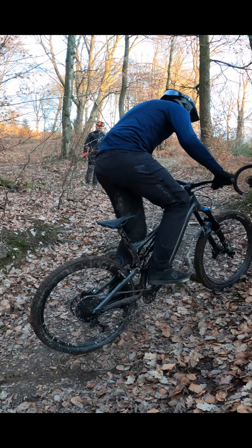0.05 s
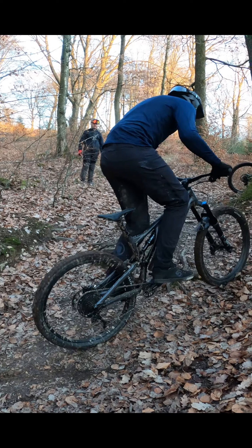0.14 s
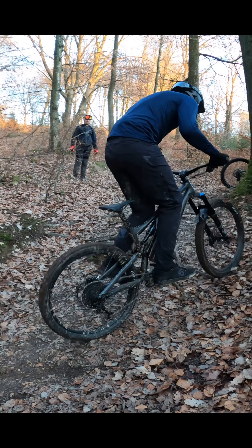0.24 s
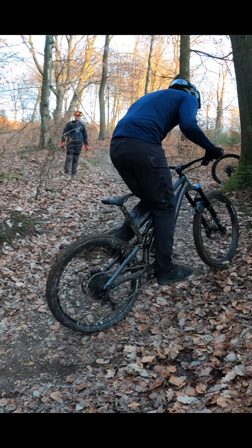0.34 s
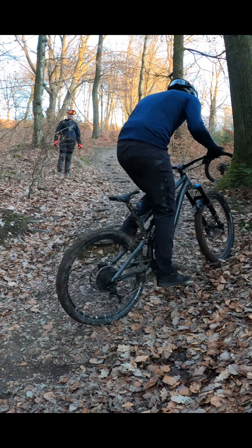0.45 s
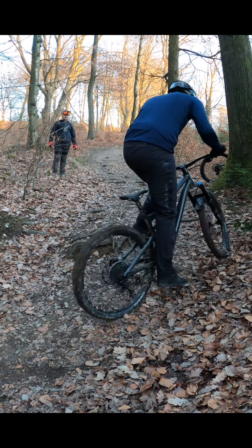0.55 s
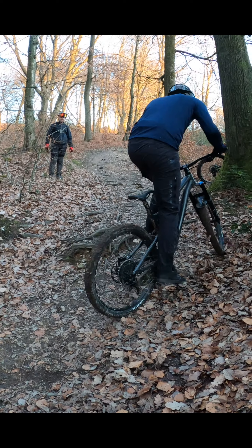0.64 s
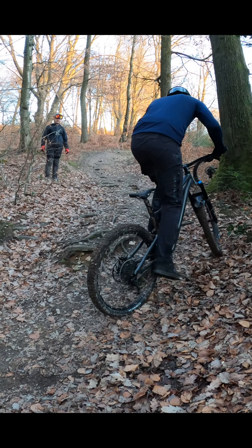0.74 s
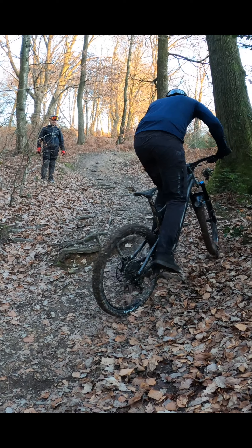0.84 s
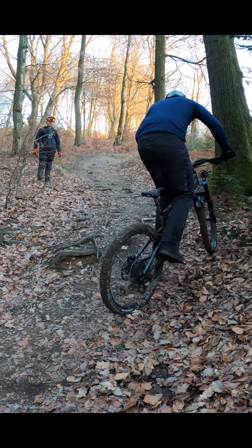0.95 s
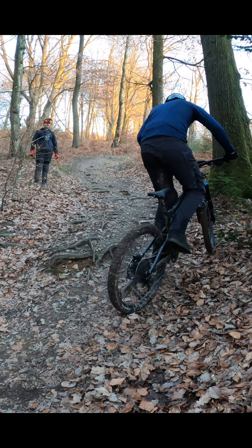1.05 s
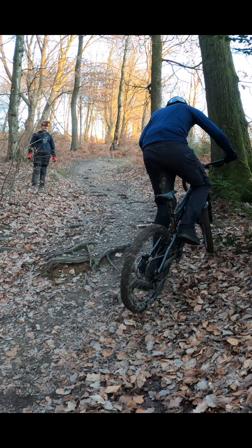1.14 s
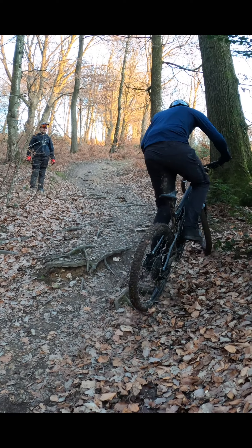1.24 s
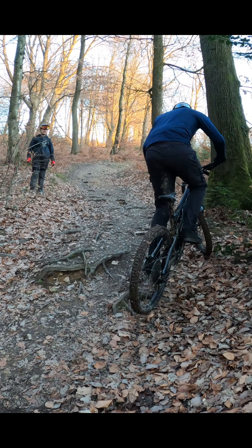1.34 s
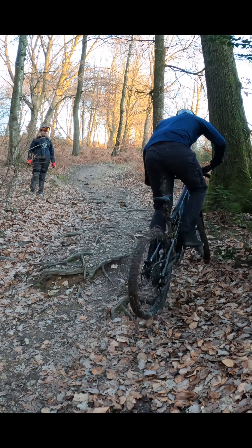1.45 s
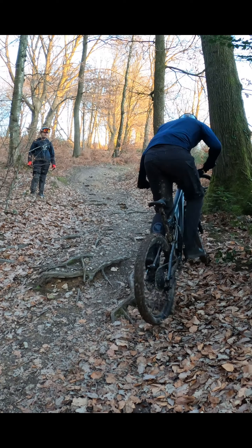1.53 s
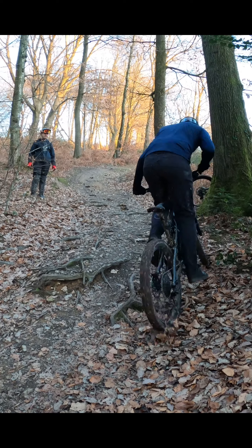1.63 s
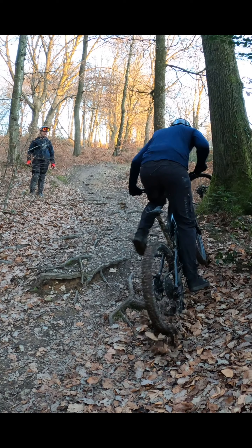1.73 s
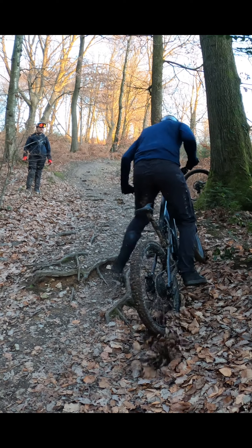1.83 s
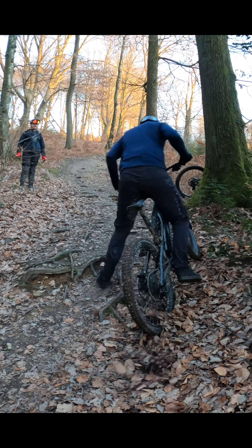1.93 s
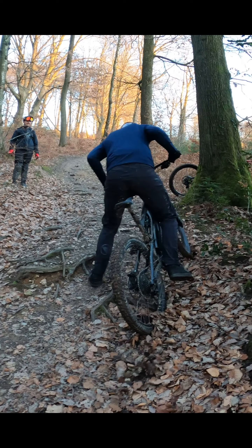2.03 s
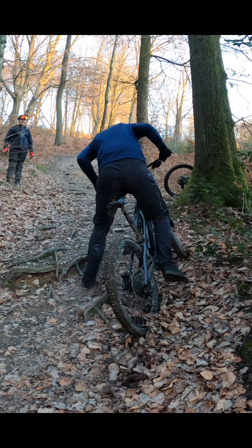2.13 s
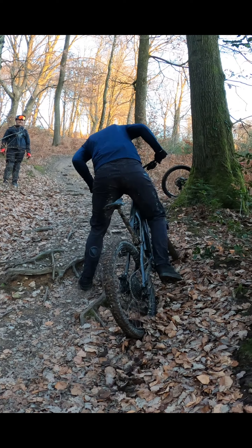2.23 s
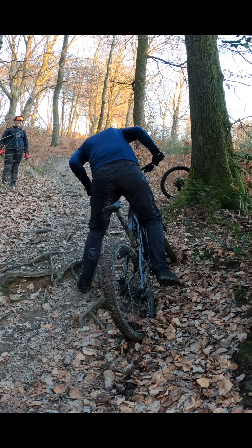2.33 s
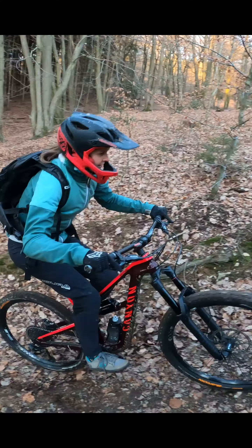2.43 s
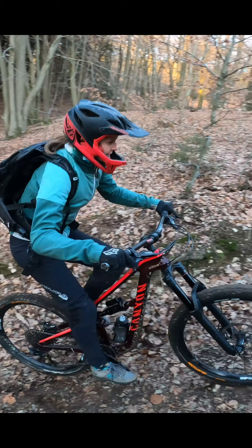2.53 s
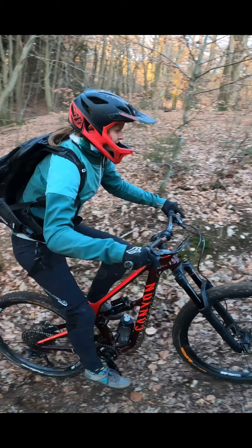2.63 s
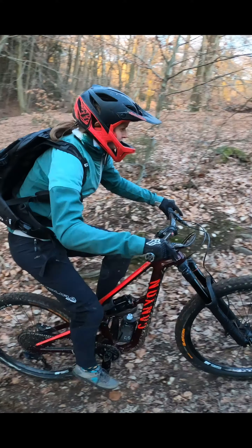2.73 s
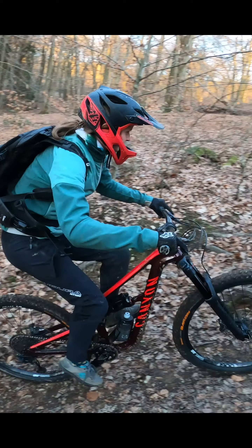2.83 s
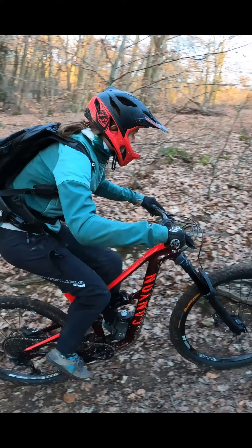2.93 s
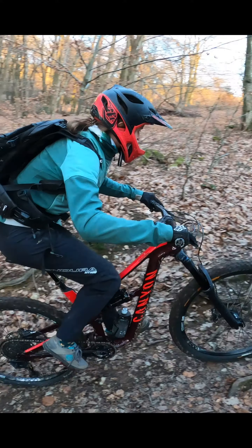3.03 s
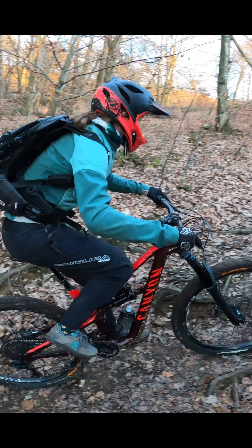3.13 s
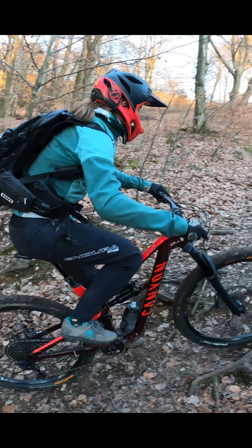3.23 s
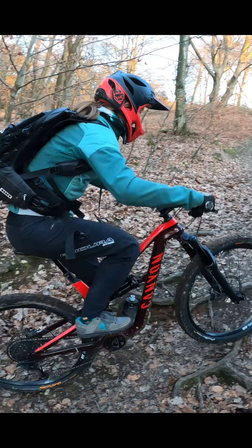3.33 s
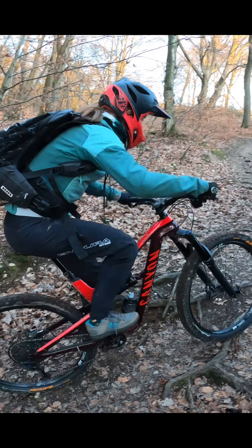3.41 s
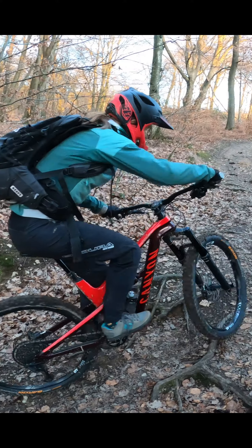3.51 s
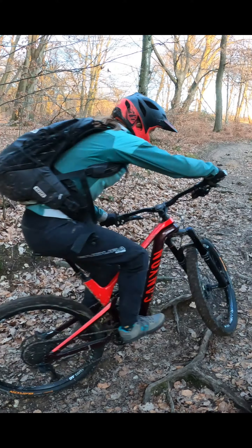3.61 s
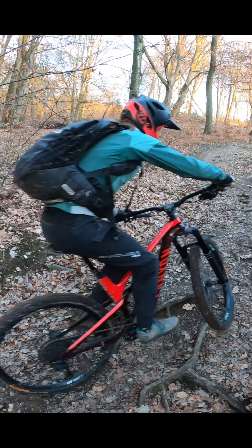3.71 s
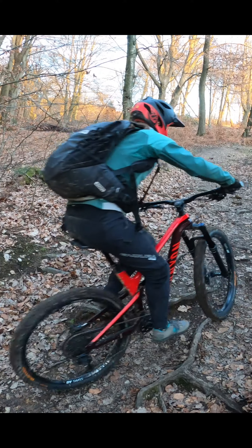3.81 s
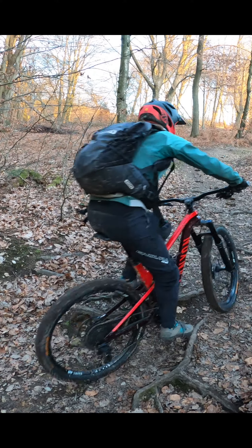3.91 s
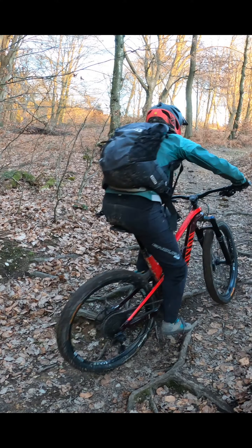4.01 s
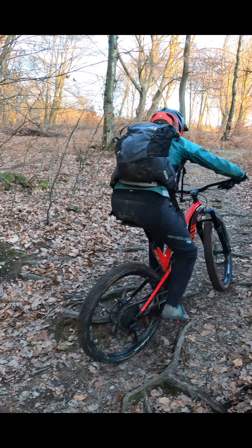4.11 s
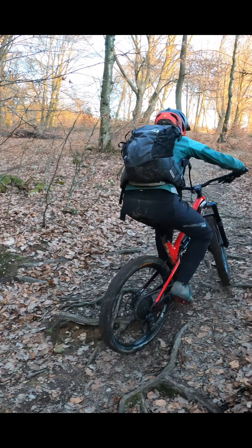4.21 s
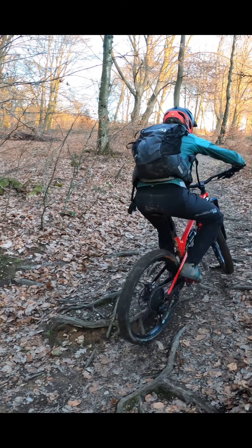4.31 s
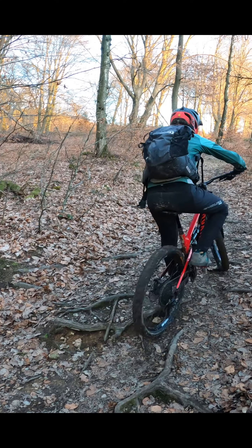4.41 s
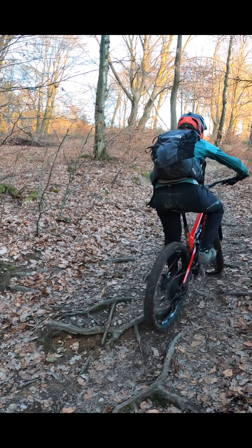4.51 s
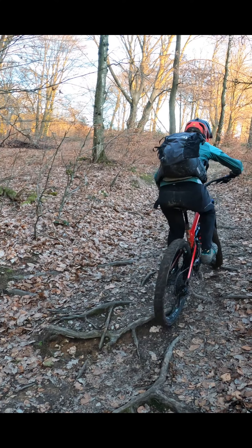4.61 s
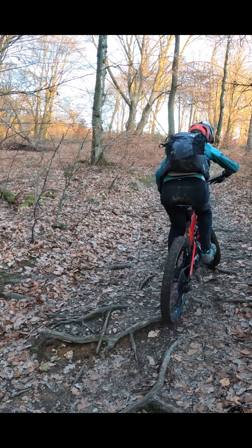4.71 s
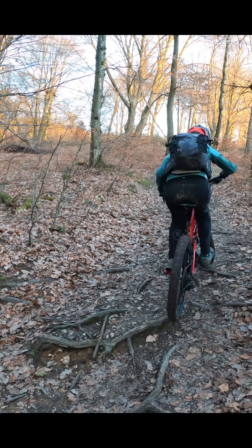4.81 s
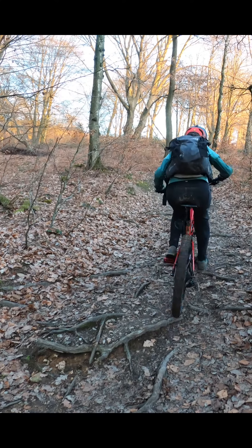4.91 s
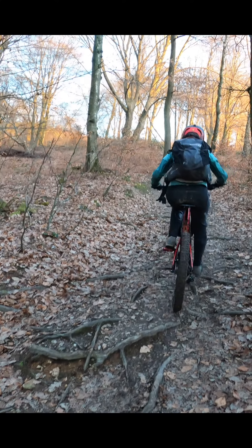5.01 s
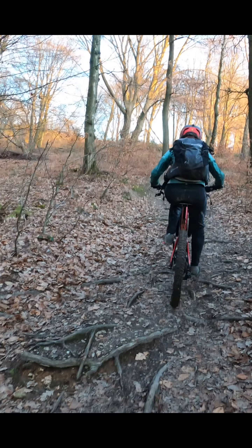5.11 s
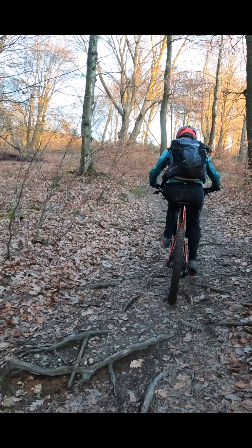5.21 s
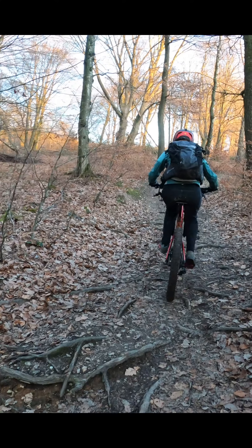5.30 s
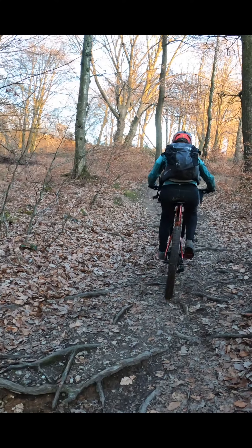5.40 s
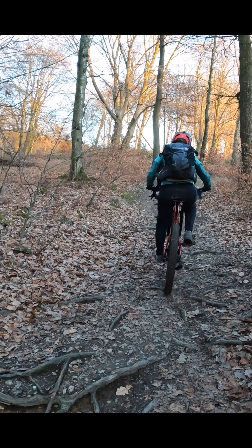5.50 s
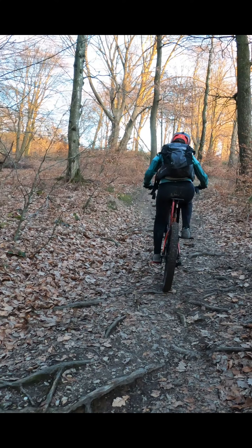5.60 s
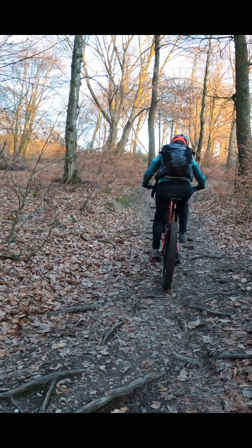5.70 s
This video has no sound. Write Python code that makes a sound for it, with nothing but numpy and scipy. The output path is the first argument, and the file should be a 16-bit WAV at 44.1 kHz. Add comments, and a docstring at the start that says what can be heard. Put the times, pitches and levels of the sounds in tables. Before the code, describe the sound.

Close by on a forest trail, mountain bike tyres crunch through dry leaves, twigs and grit, and a bird chirps once. The rear tyre spins out with a loud, rough scrape, a foot thuds down and rubber groans briefly as the bike stalls. A second bike follows with one hard knock, then rolls on uphill, its chain clinking lightly. A low rumble of air on the microphone lies underneath.

```python
"""Dry leaves crunch over a low rumble of air: two mountain bikes in turn climb a steep forest trail, close by.
Leaves and twigs break under the tread, grit grinds, knobs drum on the casings; a bird chirps once.
The first rear tyre spins out, its knobs catching and tearing loose; the rider's foot thuds down
and rubber groans as the bike stalls. The second bike takes one hard knock that rings its frame,
then rolls on up, its chain clinking over the sprockets."""
import sys
import numpy as np
from scipy import signal
from scipy.fft import rfft, irfft
from scipy.io import wavfile
from scipy.ndimage import uniform_filter1d

SR = 44100
rng = np.random.default_rng(int(sys.argv[2]) if len(sys.argv) > 2 else 0)


def wav_out(sig):
    """Save sig, one row per channel (or a flat mono array), as 16-bit PCM at SR to the path in sys.argv[1]."""
    wavfile.write(sys.argv[1], SR, np.round(np.clip(np.atleast_2d(sig).T, -1, 1) * 32767).astype(np.int16))


N = 253575
TIME = np.arange(N) / SR
SECOND_BIKE_S = 2.48


def amp(db):
    """Decibels to gain."""
    return 10 ** (np.asarray(db) / 20)


def unit(x):
    """Scales to rms 1."""
    return x / np.sqrt(np.mean(x ** 2) + 1e-20)


def follow(curve):
    """A breakpoint envelope, read at every sample."""
    return np.interp(TIME, *np.transpose(curve))


def during(curve):
    """A soft-edged gate, open while an envelope lasts."""
    return uniform_filter1d(1. * ((TIME > curve[0][0]) & (TIME < curve[-1][0])), size=200)


def arch(start, length):
    """Half a sine from start over length, zero elsewhere."""
    return np.sin(np.pi * np.clip((TIME - start) / length, 0, 1))


def add(mix, s, sound):
    """Mixes a sound in at time s."""
    part = mix[max(round(s * SR), 0):][:len(sound)]
    part += sound[:len(part)]


def colour(x, spectrum, size=8192):
    """Minimum-phase EQ, so that clicks keep their sharp attacks."""
    hz, db = np.transpose(spectrum)
    bins_hz = np.fft.rfftfreq(size, 1 / SR)
    log_gain = np.log(amp(np.interp(np.log(bins_hz + 1), np.log(hz), db)))
    cepstrum = irfft(log_gain)
    cepstrum[1:size // 2] *= 2
    cepstrum[size // 2 + 1:] = 0
    impulse = irfft(np.exp(rfft(cepstrum)))[:size // 2]
    return signal.oaconvolve(x, impulse)[:len(x)]


def drift(hz):
    """Random modulation of rms 1, up to the given rate."""
    rolloff = 1 + (np.fft.rfftfreq(N, 1 / SR) / hz) ** 4
    return unit(irfft(rfft(rng.standard_normal(N)) / rolloff, N))


def struck(modes, t, pitch=1):
    """Struck metal rings as a sum of dying sines."""
    return sum(amp(db - 60 * t / t60) * np.sin(2 * np.pi * hz * pitch * t) for hz, db, t60 in modes)


def burst(hz, t60, q, size=4096):
    """A fracture: one sharp break and a dying spray of noise through a broad resonance, peak 1."""
    spray = rng.standard_normal(size) * amp(-60 * np.arange(size) / SR / t60)
    spray[0] += 0.14 * np.linalg.norm(spray)
    ring = signal.lfilter(*signal.iirpeak(hz, q, SR), spray)
    ring = signal.lfilter(*signal.butter(2, min(2 * hz, SR / 3), fs=SR), ring)
    return ring / abs(ring).max()


def crackle(per_s, spread_db, t60, clump_db, clump_hz, wash, grains=24):
    """Countless small clicks of uneven size, swelling in clumps, over a wash of far ones."""
    out, t = np.zeros(N), np.arange(768) / SR
    for _ in range(grains):
        at = np.flatnonzero(rng.random(N) < per_s / grains / SR)
        clicks = np.zeros(N)
        clicks[at] = amp(spread_db * np.minimum(rng.exponential(1, N)[at], 4))
        grain = rng.standard_normal(len(t)) * amp(-60 * t / (t60 * rng.uniform(.5, 2)))
        out += signal.oaconvolve(clicks, unit(grain))[:N]
    texture = unit(out) + wash * rng.standard_normal(N)
    return unit(texture * amp(clump_db * drift(clump_hz)))


# envelope of the air on the microphone: t/s, level/dB
WIND_ENVELOPE = [(0, -43), (.35, -62), (.6, -53), (1, -60), (2.42, -56.5), (2.53, -46.5), (3.6, -51.5),
                 (4.6, -49.5), (5.12, -61), (5.28, -50.5), (5.45, -62)]
# EQ of the wind's rumble and of the forest's hush: f/Hz, level/dB
WIND_EQ = [(12, -12), (26, -1.5), (36, -7.5), (47, 3), (62, -8), (100, -16), (250, -47)]
FOREST_EQ = [(30, -14.5), (200, 4.5), (450, -6.5), (1300, -8), (3000, -2.5), (6000, -18), (10000, -24.5),
             (15500, -37)]


def air(forest_db=-57):
    """The bed: soft buffeting at the microphone and the even hush of the wood."""
    wind = unit(colour(rng.standard_normal(N), WIND_EQ + [(1000, -85)]))
    hush = unit(colour(rng.standard_normal(N), FOREST_EQ))
    return amp(follow(WIND_ENVELOPE)) * wind + amp(forest_db) * hush


def trunks(x, t60=0.2, wet_db=-16, predelay_s=.004, size=16384):
    """Adds weak scattered echoes from the trunks and the slope."""
    t = np.arange(size) / SR
    taps = rng.standard_normal(size) * (rng.random(size) < .05)
    taps *= amp(-60 * t / t60) * (t > predelay_s)
    return x + amp(wet_db) * signal.oaconvolve(x, taps / np.linalg.norm(taps))[:N]


def bird(start_s=.458, length_s=0.071, level_db=-45.5, base_hz=2550, lift_hz=480, sag_hz=250):
    """A small bird's thin whistle rises and falls in one arch, ending lower than it began."""
    lift = arch(start_s, length_s)
    progress = np.clip((TIME - start_s) / length_s, 0, 1)
    hz = base_hz + lift_hz * lift - sag_hz * (progress - .5)
    hz *= 1 + 0.0097 * drift(300)
    whistle = unit(np.sin(2 * np.pi * np.cumsum(hz) / SR))
    return amp(level_db) * np.sqrt(lift) * whistle


# EQ of rubbed rubber's rasp: f/Hz, level/dB
RASP_EQ = [(100, -65), (400, -20), (660, -4.5), (780, -3), (900, -9), (1400, -37), (8000, -73)]


def rubber_rub(start_s=2.11, length_s=0.12, level_db=-46, start_hz=550, sag_octaves_per_s=3.5):
    """Rubber groans and rasps as the bike stalls, its pitch sagging with the wheel's speed."""
    hz = start_hz / 2 ** (sag_octaves_per_s * np.clip(TIME - start_s, 0, length_s))
    hz *= 1 + 0.05 * drift(126)
    groan = unit(np.sin(2 * np.pi * np.cumsum(hz) / SR))
    rasp = unit(colour(rng.standard_normal(N), RASP_EQ))
    return amp(level_db) * arch(start_s, length_s) * (groan / 2 + rasp)


# cues for the second bike's chain: t/s, peak level/dB, pitch/ratio
CHAIN_CUES = [(3.037, -37, .89), (3.933, -32, 0.97), (4.062, -38, 0.92), (4.135, -31.5, 1.08),
              (4.24, -32, 1.08), (4.339, -39, 1), (4.371, -37, 0.99), (4.52, -33.5, 1.04)]
# sprocket modes: f/Hz, relative level/dB, t60/s
SPROCKET_MODES = [(2710, 4.5, 0.014), (3040, -1, .02), (3570, 2.5, 0.014), (5100, -1.5, 0.015),
                  (5860, 1, 0.015), (6200, -11, .02), (7460, -8, 0.018), (9100, -10, .015)]


def chain(rattle_s=0.0045, tick_gain=0.5, size=4096):
    """Each link rattles into its seat: a dry tick and a short metallic ring."""
    out, t = np.zeros(N), np.arange(size) / SR
    for s, db, pitch in CHAIN_CUES:
        rattle = rng.standard_normal(size) * np.exp(-t / rattle_s)
        ring = unit(signal.oaconvolve(rattle, struck(SPROCKET_MODES, t, pitch))[:size])
        tick = unit(burst(hz=5640, t60=0.094, q=1, size=size))
        clink = ring + tick_gain * tick
        add(out, s, amp(db) * clink / abs(clink).max())
    return out


# two blows to the frame, tight enough to land as one knock: t/s, level/dB
KNOCK_CUES = [(2.7579, -26), (2.7603, -18.5)]
# frame modes: f/Hz, relative level/dB, t60/s
FRAME_MODES = [(293, -3, 0.077), (494, -17, 0.039), (625, 3.5, 0.03), (990, 8, 0.0083), (1340, -2, 0.015),
               (1560, 1, 0.0066), (1930, -5, 0.016), (2380, -15, 0.013), (3300, -13, 0.018),
               (3840, -8, 0.016), (4100, -8, .016), (4400, -27, .02), (5760, -30, 0.039)]


def frame_knock(crack_db=-5, size=8192):
    """Each blow cracks and rings the frame's modes."""
    out = np.zeros(N)
    ring = struck(FRAME_MODES, np.arange(size) / SR)
    ring = signal.lfilter(*signal.butter(1, 130, "high", fs=SR), ring)  # a slim tube radiates little bass
    for s, db in KNOCK_CUES:
        crack = burst(hz=2430, t60=0.036, q=1, size=size)
        add(out, s, amp(db) * (ring / 2 + amp(crack_db) * crack))
    return out


# cues for boots and wheels landing on soil: t/s, level/dB, attack/s, f/Hz
THUD_CUES = [(.189, -38.5, 0.0017, 400), (1.543, -37.5, .004, 189), (1.609, -33.5, 0.0056, 142),
             (1.682, -25, 0.0025, 192), (1.977, -28.5, 0.0028, 227), (2.018, -24, 0.0081, 206.6),
             (2.038, -25.5, .0071, 280), (2.064, -33, 0.0069, 94), (2.353, -38.5, 0.0056, 326),
             (2.374, -34, 0.0075, 216), (3.302, -39, 0.0039, 138), (3.659, -45, 0.0036, 393)]
# EQ of packing soil: f/Hz, level/dB
SOIL_EQ = [(25, -18), (80, -14), (150, 0), (230, -11), (350, -7), (520, -12), (780, -16), (1100, -34),
           (3000, -41), (12000, -82)]


def thuds(noise_db=-3, tone_db=-3, size=8192):
    """Soil packs under a weight: a quick swell of dull noise round one low thump."""
    out, t = np.zeros(N), np.arange(size) / SR
    for s, db, attack, hz in THUD_CUES:
        push = t / attack * np.exp(1 - t / attack)
        packing = unit(push * colour(rng.standard_normal(2 * size), SOIL_EQ)[size:])
        thump = unit(push * np.sin(2 * np.pi * hz * t))
        push_rms = np.sqrt(np.mean(push ** 2))
        add(out, s, amp(db) * push_rms * (amp(noise_db) * packing + amp(tone_db) * thump))
    return out


# each bike's pass-by at its nearest: t/s, then level/dB of crunch, crisp top, grit, casing
PASS_CUES = [(.7, -50, -58.5, -57.5, -60), (3.2, -55.5, -63, -58, -58)]
# for each bike, from its nearest point until it is 3 dB fainter: t/s
PASS_FADES = [2.5, 2.2]


def pass_bys(stall_s=2.41, slowing_s=0.034):
    """Power of the four tyre layers as each bike rolls past; the first comes to a stand."""
    first, second = [amp(dbs)[:, None] ** 2 / (1 + ((TIME - s) / fade_s) ** 2)
                     for (s, *dbs), fade_s in zip(PASS_CUES, PASS_FADES)]
    moving = (1 - np.tanh((TIME - stall_s) / slowing_s)) / 2
    return np.where(TIME < SECOND_BIKE_S, first * moving, second)


# each shove at its height: t/s, length/s, then level/dB of crunch, crisp top, grit, casing
SHOVE_CUES = [(0.061, 0.19, -45, -53, -47.5, -48), (0.34, 0.14, -48, -58.5, -68, -70),
              (0.418, 0.051, -54, -64, -49, -57), (0.522, 0.064, -52, -62, -51, -66),
              (0.652, 0.28, -46.5, -52.5, -56, -62), (0.912, 0.17, -40, -48.5, -48.5, -58),
              (0.977, 0.058, -38, -47.5, -56, -72), (1.13, 0.28, -45, -53, -54, -63),
              (1.292, 0.16, -46, -53, -61, -59), (2.031, 0.15, -37.5, -44, -44, -41),
              (2.06, 0.48, -45, -52, -51, -50), (2.412, 0.16, -62, -67, -53, -54),
              (2.502, .05, -53, -56, -54, -57), (2.554, 0.12, -51, -58, -51, -52.5),
              (2.669, 0.22, -48, -57.5, -49.5, -49), (2.836, 0.18, -52, -58.5, -51.5, -48.5),
              (3.36, 0.19, -60, -65, -50, -51.5), (3.678, 0.058, -72, -78, -77, -50.5),
              (3.956, 0.18, -51, -60.5, -56, -56), (4.103, 0.17, -53, -62.5, -52.5, -70),
              (4.251, 0.3, -57.5, -68, -55, -49.5), (4.692, .2, -47.5, -58, -48, -55.5),
              (4.96, 0.54, -47, -53.5, -48, -65), (5.082, 0.15, -41, -49, -55, -56),
              (5.18, 0.029, -39.5, -40.5, -57, -64), (5.216, 0.046, -43, -49, -62, -72),
              (5.505, 0.67, -60, -65, -50.5, -56.5)]


def shoves(attack_share=0.53, edge_drop_db=9, roundness=1.84):
    """Power of the four tyre layers as pedal strokes, roots and slips shove a tyre into the ground."""
    power = np.zeros((4, N))
    for s, length, *dbs in SHOVE_CUES:
        # 0 at the shove's height, 1 at either end
        away = np.maximum((s - TIME) / attack_share, (TIME - s) / (1 - attack_share)) / length
        near = away < 3
        power[:, near] += amp(np.array(dbs)[:, None] - edge_drop_db * away[near] ** roundness) ** 2
    return power


# EQ of grinding grit and of the hollow tyre casing: f/Hz, level/dB
GRIT_EQ = [(200, -18.5), (420, -5.5), (600, 1.5), (820, 0.5), (1050, -0.5), (1330, 2), (1700, -13.5),
           (2800, -0.5), (10000, -66)]
CASING_EQ = [(40, -13), (90, -8.5), (125, -5.5), (170, -1), (240, -0.5), (320, -4.5), (450, -10),
             (900, -37.5), (5000, -65)]


def rolling(grit_db, casing_db, grit_trim_db=-1.5):
    """Grit grinds under the knobs, and the knobs drum on the tyre casing."""
    grains = crackle(per_s=1100, spread_db=4.0, t60=0.0063, clump_db=3.5, clump_hz=35.4, wash=0.75)
    taps = crackle(per_s=400, spread_db=1.4, t60=0.0053, clump_db=1.5, clump_hz=28, wash=0.65)
    grit = unit(colour(grains, GRIT_EQ))
    drum = unit(colour(taps, CASING_EQ))
    return amp(grit_db + grit_trim_db) * grit + amp(casing_db) * drum


# EQ of the first bike's leaf crunch, the second bike's, and their crisp top: f/Hz, level/dB
FIRST_CRUNCH_EQ = [(200, -79), (700, -6.5), (1300, 5), (2000, 3.5), (2900, 5.5), (4400, 6.5), (5500, -3),
                   (7000, -7), (9000, -17.5), (16000, -46.5)]
SECOND_CRUNCH_EQ = [(200, -38), (700, -10.5), (1400, 0), (2000, 0.5), (2800, -1.5), (3900, 0), (4900, -4.5),
                    (6200, -7.5), (9000, -23.5), (16000, -43.5)]
CRISP_EQ = [(3500, -27.5), (5400, -8), (6400, 9), (7500, 10.5), (8500, 10), (9400, 3.5), (12000, -3),
            (14000, -9.5), (15600, -29)]


def leaves(crunch_db, crisp_db, stems_db=-10):
    """Dry leaves break under the tread; the same fractures give the crunch and its crisp top."""
    blades = crackle(per_s=1700, spread_db=2.5, t60=0.0067, clump_db=1.44, clump_hz=34.4, wash=1.0)
    stems = crackle(per_s=110, spread_db=1.5, t60=0.0022, clump_db=0.1, clump_hz=10, wash=0)
    breaks = blades + amp(stems_db) * stems
    first, second, crisp = [unit(colour(breaks, eq))
                            for eq in (FIRST_CRUNCH_EQ, SECOND_CRUNCH_EQ, CRISP_EQ)]
    crunch = np.where(TIME < SECOND_BIKE_S, first, second)
    return amp(crunch_db) * crunch + amp(crisp_db) * crisp


def small_snaps(layer_db, over_db, spread_db, hz, spread_octaves, t60, count):
    """Stiff leaves and thin twigs break at random, riding the level of the layer round them."""
    out = np.zeros(N)
    for place, strength, pitch in rng.uniform(-1, 1, (count, 3)):
        at = int((place + 1) / 2 * N)
        snap = burst(hz * 2 ** (spread_octaves * pitch), t60, q=1.5)
        add(out, at / SR, amp(layer_db[at] + over_db + spread_db * strength) * snap)
    return out


# cues for the loudest twigs and pebbles: t/s, peak level/dB, centre f/Hz, t60/s
SNAP_CUES = [(0.194, -36, 4080, 0.039), (0.414, -35, 2400, 0.044), (0.534, -33.5, 1510, 0.021),
             (.716, -35, 5500, .015), (.903, -28, 1410, 0.12), (1.184, -25.5, 2900, 0.034),
             (1.546, -29, 920, 0.18), (1.605, -16.5, 880, 0.043), (1.769, -22.5, 1210, 0.029),
             (1.795, -22, 3860, 0.015), (2.009, -23.5, 620, .013), (2.045, -24, 2400, 0.04),
             (2.048, -29.5, 8000, 0.054), (2.107, -21, 3930, 0.016), (2.357, -34, 774, 0.044),
             (2.556, -31.5, 2820, 0.018), (2.718, -30.5, 2390, 0.094), (2.724, -37, 9000, .025),
             (2.799, -32, 5860, 0.029), (2.882, -36, 1500, .027), (3.3, -32.5, 840, .028),
             (3.662, -36, 2380, 0.033), (4.039, -32.5, 2110, 0.035), (4.104, -33, 1270, 0.052),
             (4.29, -36, 1800, .04), (5.121, -29, 3000, 0.0065), (5.161, -27.5, 1990, .018),
             (5.172, -21.5, 2820, 0.014), (5.186, -25, 9000, 0.013), (5.205, -30.5, 1670, .04),
             (5.211, -33, 9500, .023), (5.367, -35, 4600, 0.014), (5.409, -31, 970, 0.009),
             (5.447, -34, 2460, .03), (5.684, -38, 2600, 0.064)]


def loud_snaps():
    """Single twigs and pebbles crack out above the crunch; dry, with hardly any pitch."""
    out = np.zeros(N)
    for s, db, hz, t60 in SNAP_CUES:
        add(out, s, amp(db) * burst(hz, t60, q=1.4))
    return out


# crunch and crisp top of flung leaves at the height of the wheelspin: level/dB
FLUNG_LEVELS = [-37, -44.5]


def flung_leaves(db_per_db=0.37):
    """Power of the two leaf layers as the spinning tyre flings leaves, loosely following its force."""
    force_db = follow(SPIN_ENVELOPE)
    level_db = np.array(FLUNG_LEVELS)[:, None] + db_per_db * (force_db - force_db.max())
    return (during(SPIN_ENVELOPE) * amp(level_db)) ** 2


# envelope of the rear tyre spinning on dirt: t/s, level/dB
SPIN_ENVELOPE = [(1.532, -52), (1.55, -35), (1.61, -26.5), (1.64, -28), (1.67, -21.5), (1.712, -26.5),
                 (1.775, -23.5), (1.83, -38.5), (1.88, -55)]
# EQ of its scrape: f/Hz, level/dB
SCRAPE_EQ = [(30, -41), (65, -13), (100, -1.5), (145, -7.5), (218, 4.5), (265, -6), (320, -13), (480, -13),
             (660, -13.5), (800, -9), (960, -9), (1220, -12.5), (1550, -22.5), (4200, -22), (7000, -41),
             (16000, -66)]


def wheelspin(knob_hz=112, jitter=.28, uneven_db=1, dirt_db=.5, spoke_hz=463, spoke_t60=.51, spoke_db=-36):
    """Knobs catch and tear loose unevenly, each spraying dirt; the shaking sets a spoke ringing."""
    knobs_passed = np.cumsum(knob_hz * np.exp(jitter * drift(69.7))) / SR
    catches = np.diff(np.floor(knobs_passed), prepend=0) * amp(uneven_db * drift(49))
    dirt = rng.standard_normal(N) * (0.67 + np.exp(-(knobs_passed % 1) / 0.33))
    # soft rubber rounds off each catch; the dirt supplies the roughness above
    push = signal.lfilter(*signal.butter(1, 700, fs=SR), unit(catches))
    force = amp(follow(SPIN_ENVELOPE)) * during(SPIN_ENVELOPE)
    scrape = force * unit(colour(push + amp(dirt_db) * unit(dirt), SCRAPE_EQ))
    kept_per_sample = amp(-60 / spoke_t60 / SR) ** 2
    energy = signal.lfilter([1], [1, -kept_per_sample], force ** 2)
    spoke = np.sqrt(energy / energy.max()) * np.sin(2 * np.pi * spoke_hz * TIME)
    return scrape + amp(spoke_db) * spoke


# stereo width between the two microphone ports: f/Hz, side level/dB relative to mid
SIDE_EQ = [(2000, -50.5), (4500, -52), (8000, -20.5), (10000, -27), (11500, -3), (15000, 4)]


def widen(mid):
    """Everything is central; only the top treble reaches the two ports with unrelated phase."""
    frames = signal.stft(mid, nperseg=128)[2]
    scattered = signal.istft(frames * np.exp(2j * np.pi * rng.random(frames.shape)))[1][:N]
    side = colour(scattered, SIDE_EQ)
    return np.array([mid + side, mid - side])


def scene():
    """The mix: bikes and bird echo among the trunks, over the bed of air."""
    tyre_power = pass_bys() + shoves()
    tyre_power[:2] += flung_leaves()
    crunch_db, crisp_db, grit_db, casing_db = 10 * np.log10(tyre_power + 1e-14)
    twigs = small_snaps(crunch_db, over_db=11.5, spread_db=2, hz=2430, spread_octaves=.8,
                        t60=0.017, count=20)
    leaf_edges = small_snaps(crisp_db, over_db=13, spread_db=5, hz=6000, spread_octaves=.3,
                             t60=0.011, count=36)
    ground = leaves(crunch_db, crisp_db) + rolling(grit_db, casing_db) + loud_snaps() + twigs + leaf_edges
    bikes = ground + wheelspin() + thuds() + frame_knock() + chain() + rubber_rub()
    return widen(trunks(bikes + bird()) + air())


def record(dry, rolloff_hz=15000, edge_hz=15700):
    """The microphone dulls towards the top; a steep low-pass cuts off the rest."""
    dull = signal.lfilter(*signal.butter(2, rolloff_hz, fs=SR), dry)
    low_pass = signal.firwin(511, edge_hz, window=("kaiser", 9), fs=SR)
    return signal.oaconvolve(dull, low_pass[None], "same")


dry = scene()
out = record(dry)
wav_out(out)
```